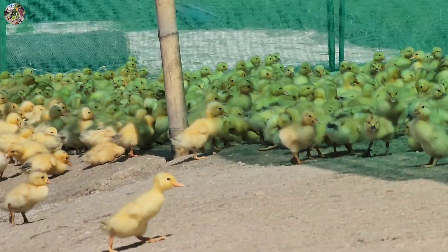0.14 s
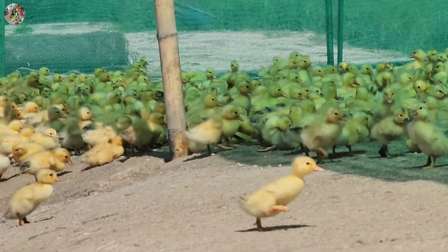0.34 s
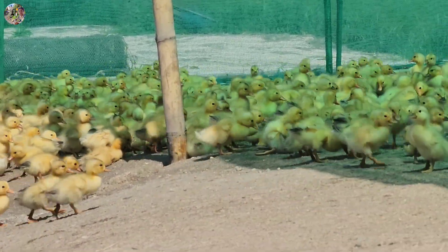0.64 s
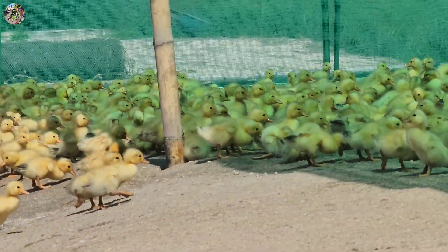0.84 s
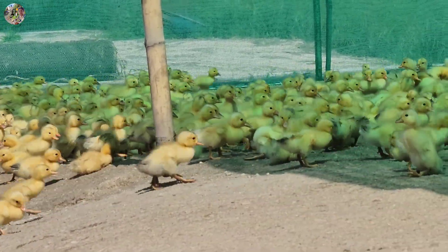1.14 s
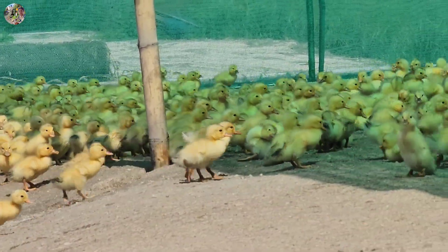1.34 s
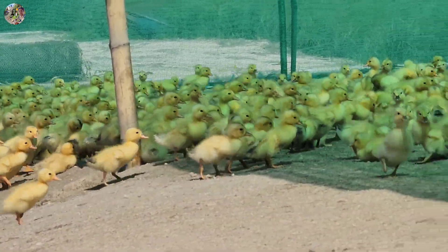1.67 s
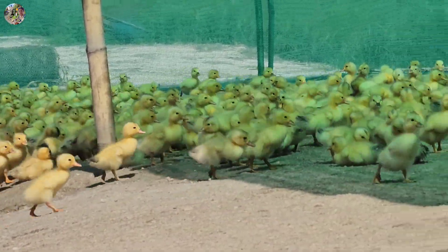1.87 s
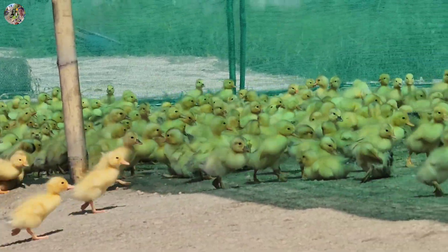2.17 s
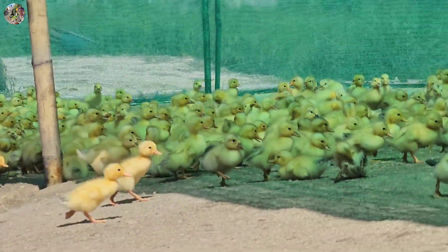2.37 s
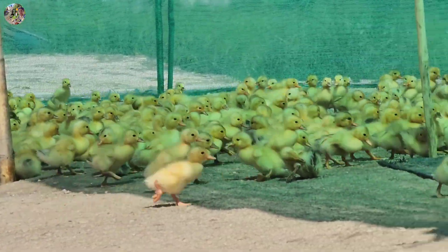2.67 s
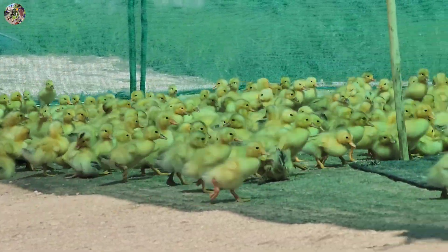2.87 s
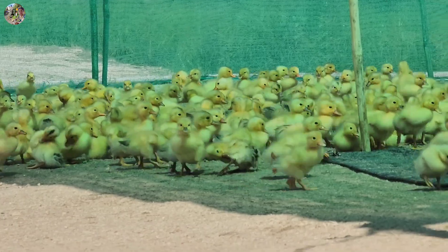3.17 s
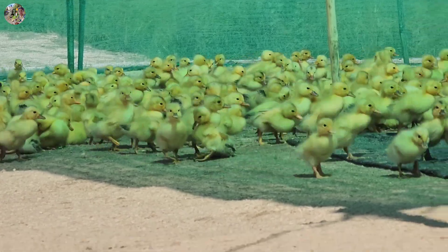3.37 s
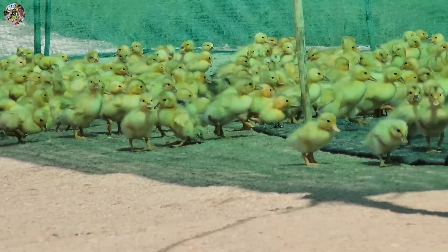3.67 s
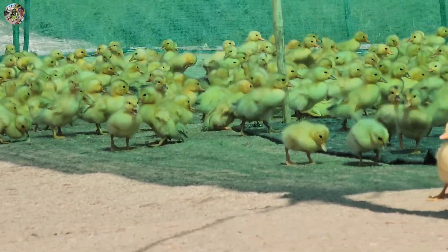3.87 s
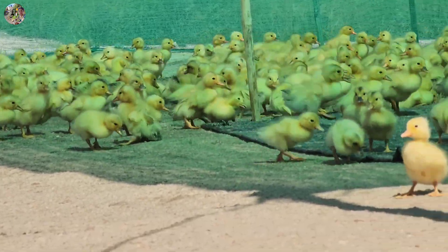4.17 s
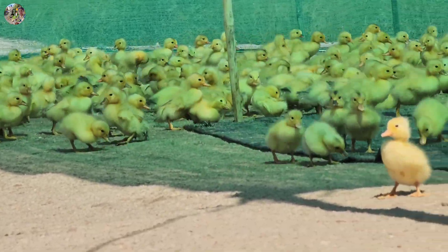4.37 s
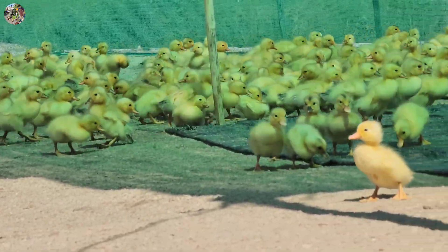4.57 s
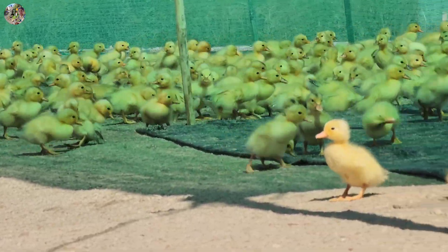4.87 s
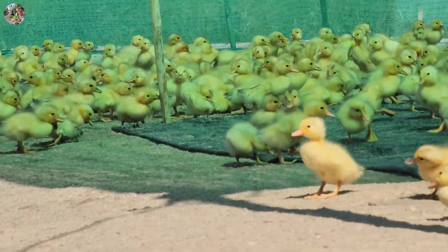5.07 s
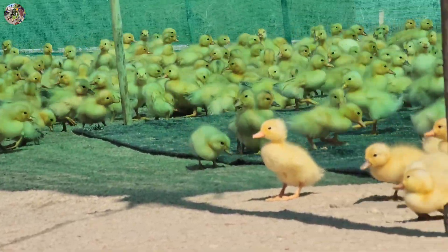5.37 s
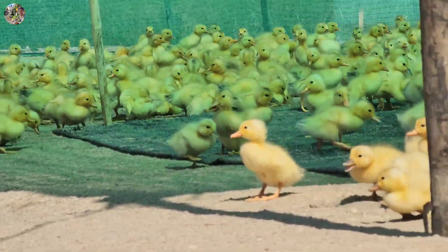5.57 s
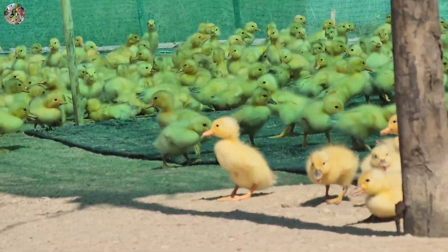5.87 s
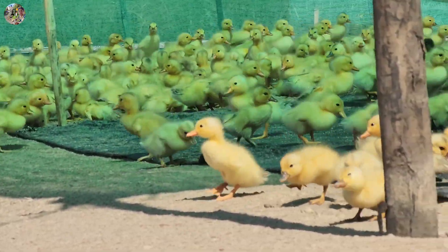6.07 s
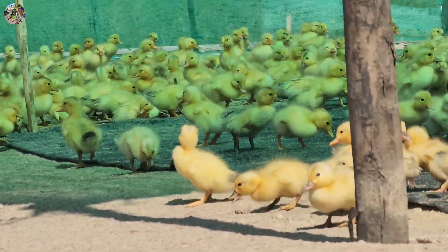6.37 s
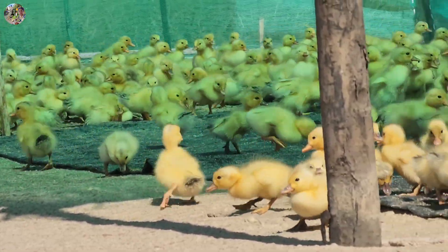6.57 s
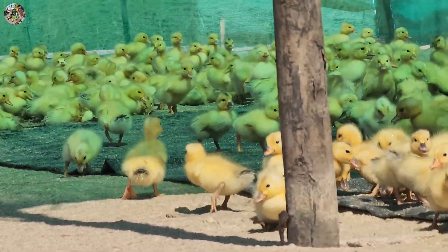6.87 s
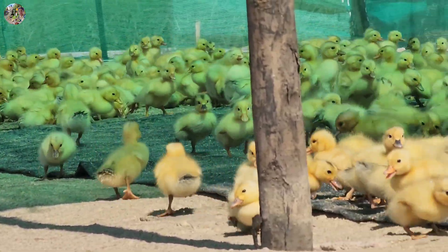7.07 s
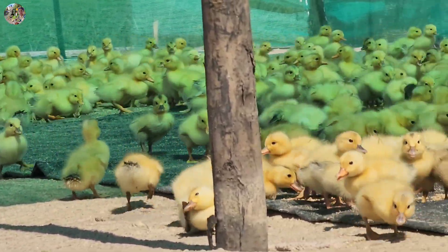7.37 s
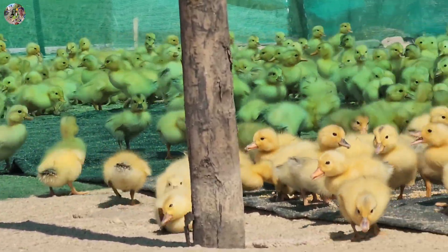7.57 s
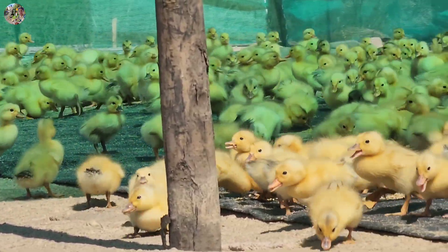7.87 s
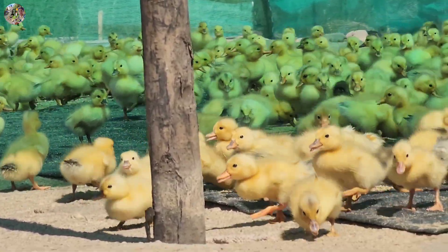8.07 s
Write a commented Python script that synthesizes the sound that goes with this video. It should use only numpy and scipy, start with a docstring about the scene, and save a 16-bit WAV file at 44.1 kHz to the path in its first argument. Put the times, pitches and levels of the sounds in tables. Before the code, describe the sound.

Many ducklings cheep near and far over a steadily puttering small engine, with pattering feet on sand, early rattles and low wind bumps.

```python
"""In a netted outdoor pen a flock of ducklings peeps, a few near and many far: wavering near-sines on curved pitch paths.
Their feet patter on sand as shaped, grainy hiss, with short snaps of grit.
A small engine idles nearby: each firing rings exhaust resonances, with clatter and ticks; hard low thumps stand out.
Wind rumbles as low noise on two microphone ports, and early on something near rattles as struck, damped modes.
A soft airy hiss lies beneath, and the yard scatters a short echo of the birds, snaps, ticks and rattle."""
import sys
import numpy as np
from scipy import signal
from scipy.io import wavfile
from scipy.ndimage import uniform_filter1d

SR = 44100
rng = np.random.default_rng(int(sys.argv[2]) if len(sys.argv) > 2 else 0)


def to_wav(s):
    """Save 16-bit WAV."""
    ch = np.atleast_2d(s).T  # columns
    pcm = np.round(np.clip(ch, -1, 1) * 32767)  # PCM
    wavfile.write(sys.argv[1], SR, pcm.astype(np.int16))


N = 363384  # samples in the scene


def amp(db):
    """Decibel law: 20 dB is a factor of ten in pressure."""
    return 10 ** (np.asarray(db) / 20)


def evened(x):
    """Normalization to unit root-mean-square."""
    return x / np.sqrt(np.mean(x ** 2) + 1e-20)


def curve(points, t):
    """Linear interpolation of a table in time."""
    return np.interp(t, *np.transpose(points))


def read(points, hz):
    """Interpolation of a spectrum table on a logarithmic frequency axis."""
    f, value = np.transpose(points)
    return np.interp(np.log(hz + 1), np.log(f + 1), value)


def sides(pan_db):
    """Level difference between channels: left and right gains, positive towards the left."""
    return amp(np.array([pan_db, -pan_db]) / 2)


def add(mix, s, sound, pan_db=0, lag=0):
    """Superposition with a time difference: the left side is lag samples late, the right if negative."""
    for channel, gain, late in zip(mix, sides(pan_db), (max(lag, 0), max(-lag, 0))):
        part = channel[round(s * SR) + late:][:len(sound)]
        part += gain * sound[:len(part)]


# Likeness of the two ports. Each row: frequency in Hz, left-right correlation before scaling.
LIKENESS = [(60, 1), (150, 1), (380, 0.81), (950, 0.12), (2380, 0.021), (5980, 0), (15000, 0.013)]
# Balance of the two ports. Each row: frequency in Hz, left-right difference in dB.
BALANCE = [(60, -2.5), (180, -0.5), (550, 2), (1650, 2), (4970, 0), (15000, -2.5)]


def noise(tone, size, patchy_db, bins, frames_wide, alike=1):
    """Short-time spectral synthesis: random spectra with drifting patches, partly coherent between ports."""
    frames, hz = N * 4 // size + 5, np.fft.rfftfreq(size, 1 / SR)
    a, b, c, d, patches = rng.standard_normal((frames, len(hz), 5)).T
    patches = uniform_filter1d(patches, bins, 0)
    patches = evened(uniform_filter1d(patches, frames_wide, 1))
    same = np.clip(alike * read(LIKENESS, hz), -1, 1)[:, None]
    left = a + 1j * b
    right = same * left + np.sqrt(1 - same ** 2) * (c + 1j * d)
    spectra = np.array([left, right])
    spectra *= amp(read(tone, hz)[:, None] + patchy_db * patches)
    spectra *= sides(read(BALANCE, hz))[:, :, None]
    sound = signal.istft(spectra, nperseg=size, noverlap=size * 3 // 4)[1]
    return evened(sound[:, :N])


# Strength of the wind. Each row: time in seconds, level in dB averaged over the ports.
GUSTS = [(0.0, -37.5), (2.6, -42.5), (3.44, -48), (4.41, -31), (4.45, -46.5), (6.95, -40), (7.0, -32),
         (7.37, -30), (7.69, -33.5), (7.82, -23), (7.94, -37), (8.16, -26), (8.24, -37)]
# Spectrum of the wind noise. Each row: frequency in Hz, relative density in dB per Hz.
WIND_SPECTRUM = [(12, -43), (20, -24), (45, 3.5), (115, 1), (160, -4), (200, -12.5), (250, -27),
                 (400, -28.5), (550, -56), (800, -90)]


def gusts():
    """Turbulent pressure noise: weakly coherent low-frequency noise follows the gust curve."""
    rumble = noise(WIND_SPECTRUM, size=2048, patchy_db=2.5, bins=6, frames_wide=3, alike=.4)
    level = amp(curve(GUSTS, np.arange(N) / SR))
    return rumble * level * sides(0.7)[:, None]


# Spectrum of the airy hiss. Each row: frequency in Hz, relative density in dB per Hz.
AIR_SPECTRUM = [(120, -10), (200, -6), (304, -11.5), (576, -11), (860, -14), (1430, -13.5), (2340, -19.5),
                (3020, -17), (4600, -24.5), (9190, -25.5), (11000, -31.5), (14500, -28.5), (15600, -40)]
AIR_DB = -47.5


def air():
    """Stationary broadband noise: a soft background hiss at constant mean level."""
    return amp(AIR_DB) * noise(AIR_SPECTRUM, size=1024, patchy_db=2.5, bins=10, frames_wide=12)


# Feet and down of the flock on sand. Each row: time in seconds, level in dB.
RUSTLE_LEVEL = [(0, -52.5), (3.5, -52), (5.67, -56.5), (8.24, -47.5)]
# Spectrum of the rustle. Each row: frequency in Hz, relative density in dB per Hz.
RUSTLE_SPECTRUM = [(500, -24), (1500, 1.5), (3000, -2), (6000, -0.5), (9000, -6), (11000, -10.5),
                   (15500, -11.5)]
# Near birds scurry. Each row: peak time in seconds, build-up time constant in seconds, peak level in dB.
SCURRIES = [(0.44, 0.0061, -39), (0.6, 0.041, -48), (0.617, 0.0069, -47), (1.092, 0.006, -45.5),
            (1.12, 0.023, -46), (1.2, 0.0034, -60), (1.235, 0.017, -58), (3.165, 0.0072, -42),
            (3.44, 0.029, -51)]
SCURRY_FADE_S = 0.018  # time constant


def patter():
    """Friction noise: feet scuff the sand in short uneven grains of hiss, gathered in flurries."""
    t = np.arange(N) / SR
    level = amp(curve(RUSTLE_LEVEL, t))
    for s, build, db in SCURRIES:
        level = level + amp(db) * np.exp(np.minimum((t - s) / build, (s - t) / SCURRY_FADE_S))
    strength = amp(1.5 * np.minimum(rng.exponential(1, (2, N)), 5))
    steps = strength * (rng.random((2, N)) < 350 / SR)  # 350 a second at each port
    shared = steps + .5 * steps[::-1]  # half of each grain reaches the other port
    decay = np.exp(-np.arange(600) / SR / 0.0038)
    grains = signal.oaconvolve(shared, decay[None])[:, :N]
    flurry = uniform_filter1d(rng.standard_normal(N), size=1800)
    flurry = evened(uniform_filter1d(flurry, size=1800))
    hiss = noise(RUSTLE_SPECTRUM, size=256, patchy_db=2.0, bins=8, frames_wide=20)
    return evened(hiss * (1.5 + evened(grains)) * amp(2.16 * flurry)) * level


# Idle speed of the engine. Each row: time in seconds, firings per second.
IDLE_SPEED = [(0, 22.695), (.9, 24.344), (1.6, 24.342), (3.1, 23.594), (3.8, 22.697), (4.6, 22.283),
              (5.1, 21.49), (5.6, 22.017), (6.6, 23.017), (8.24, 24.66)]
FIRST_FIRING_S = .0061


def firings():
    """Phase accumulation: a firing falls where the running count of engine cycles passes a whole number."""
    t = np.arange(FIRST_FIRING_S, N / SR, 1 / SR)
    cycles = np.cumsum(curve(IDLE_SPEED, t)) / SR
    return np.interp(np.arange(int(cycles[-1]) + 1), cycles, t)


# Strength of the thumps. Each row: time in seconds, typical peak in dB.
THUMP_LEVEL = [(0, -26.5), (1.4, -28), (2.7, -29.5), (4.1, -29), (5.5, -30), (6.9, -29), (8.24, -24.5)]
# Resonances of the exhaust pipe. Each row: typical frequency in Hz, typical relative level in dB, T60 in seconds.
PIPE_MODES = [(123.6, 3, 0.11), (91, -6.5, 0.16), (68.8, -10.5, 0.26)]
# Valve gear at every firing. Each row: time in seconds, typical onset level in dB.
CLATTER_LEVEL = [(0, -44.5), (1.5, -52.5), (3, -46.5), (4.5, -50), (6, -53), (8.24, -41)]
# The silencer takes the edge off each thump.
MUFFLER = signal.butter(3, [45, 198], "bandpass", fs=SR, output="sos")


def engine():
    """Impulsive excitation of pipe resonances: each firing of one cylinder thumps, and valve gear clatters."""
    out, t = np.zeros((2, N)), np.arange(4000) / SR
    hz, mode_db, t60 = np.transpose(PIPE_MODES)[:, :, None]
    gear = signal.butter(2, [900, 3300], "bandpass", fs=SR)
    onset = np.sin(np.pi / 2 * np.minimum(t / 0.0047, 1)) ** 2
    for at in firings():
        strength, detune, loose, *weight = rng.standard_normal(3 + len(PIPE_MODES))
        decay = amp(mode_db + 5.84 * np.c_[weight] - 60 * t / t60)
        ring = decay * np.sin(2 * np.pi * hz * (1 + 0.053 * detune) * t)
        thump = -ring.sum(0) * onset  # the pressure first drops
        thump = signal.sosfilt(MUFFLER, thump)
        thump_gain = amp(curve(THUMP_LEVEL, at) + 2.67 * strength)
        add(out, max(at - .004, 0), thump_gain * thump / abs(thump).max(), 1.2)
        clack = evened(signal.lfilter(*gear, rng.standard_normal(800)))
        clack = clack * np.exp(-t[:800] / 0.0043)
        add(out, at, amp(curve(CLATTER_LEVEL, at) + 2 * loose) * clack, 2.5, lag=5)
    return out


def knocks(events, modes, rise, lag, chatter_db, puff_db, spread_db, detune_by):
    """Modal synthesis: a blow and its loose chatter ring slightly detuned damped modes, with a dry puff."""
    out, t = np.zeros((2, N)), np.arange(1500) / SR
    hz, mode_db, t60 = np.transpose(modes)[:, :, None]
    for s, db in events:
        detune, weight = rng.standard_normal((2, len(modes), 1))
        decay = amp(mode_db + spread_db * weight - 60 * t / t60)
        ring = decay * np.sin(2 * np.pi * hz * (1 + detune_by * detune) * t)
        ring = ring.sum(0) * (1 - np.exp(-t / rise))
        puff = amp(puff_db - 60 * t / 0.0031) * uniform_filter1d(rng.standard_normal(len(t)), size=2)
        chatter = amp(chatter_db - 60 * t / 0.052) * rng.standard_normal(len(t))
        blows = chatter * (rng.random(len(t)) < .02)
        blows[0] = 1
        knock = signal.fftconvolve(ring / abs(ring).max() + puff, blows)
        add(out, s, amp(db) * knock, 1.2, lag)
    return out


# Soft ticks at the other firings. Each row: time in seconds, mean nominal peak in dB.
SOFT_TICK_LEVEL = [(0, -51.5), (1.6, -44), (2.1, -45), (3.1, -57), (3.6, -46), (4.3, -45), (5.3, -44),
                   (5.8, -46), (6.9, -45), (8.24, -64)]
# Loudest ticks, most of them of the valve gear. Each row: start in seconds, nominal peak in dB.
LOUD_TICKS = [(2.1351, -40), (2.1769, -35.5), (2.217, -36), (2.5518, -36.5), (2.636, -33), (2.7198, -40),
              (2.764, -34.5), (2.804, -37), (3.144, -36), (3.522, -34), (3.926, -32.5), (3.9689, -35.5),
              (4.232, -35), (4.28, -36), (4.593, -41), (4.635, -33.5), (4.6832, -41), (4.7263, -36),
              (4.771, -39), (4.8167, -37), (4.8632, -34.5), (4.909, -37), (4.9558, -32), (5.003, -32),
              (5.0484, -41), (5.0943, -35), (5.1405, -35), (5.1864, -39), (5.2325, -39), (5.2774, -42),
              (5.4149, -36.5), (5.507, -36), (7.2936, -34)]
TICK_SPREAD_DB = 4.5  # standard deviation


def soft_ticks():
    """Periodic excitation of random strength: one tick at every firing that has no loud tick nearby."""
    at = firings()
    db = curve(SOFT_TICK_LEVEL, at) + TICK_SPREAD_DB * rng.standard_normal(len(at))
    to_loud = abs(at[:, None] - np.transpose(LOUD_TICKS)[0]).min(axis=1)
    return np.c_[at, db][to_loud > .015]


# Modes of a tick. Each row: typical frequency in Hz, typical relative level in dB, T60 in seconds.
TICK_MODES = [(1894, 3, 0.02), (2770, -2, 0.014), (2120, -1.5, 0.016)]


def ticks():
    """Impact of small parts: loud and soft ticks, nearly all of the engine, ring a few quickly damped modes."""
    return knocks([*LOUD_TICKS, *soft_ticks()], TICK_MODES, rise=0.00049, lag=5,
                  chatter_db=-14, puff_db=-8, spread_db=1.0, detune_by=0.01)


OCTAVE_DB = -11  # overtone of the short peeps, reached at their end
FLUTTER_DB, WAVER = 3.5, .011  # unsteadiness of level in dB and of pitch as a share


def peep(hz, db, octave_db=OCTAVE_DB, flutter_db=FLUTTER_DB, round_by=0.54):
    """Self-sustained oscillation of the syrinx: an unsteady near-sine on a pitch path, with a growing octave."""
    u = np.linspace(0, 1, len(hz))
    wobble = uniform_filter1d(rng.standard_normal((2, len(u))), size=200)
    wobble = evened(wobble - wobble.mean(axis=1, keepdims=True))
    phase = 2 * np.pi * np.cumsum(hz * (1 + WAVER * wobble[0])) / SR
    swell = evened(abs(np.sin(np.pi * u)) ** round_by * amp(flutter_db * wobble[1]))
    tone = np.sin(phase) + amp(octave_db) * u * np.sin(2 * phase)
    return np.sqrt(2) * amp(db) * swell * tone


def arched(length, middle, rise, height):
    """Parabolic frequency modulation: a slope with an arch on top, reaching middle halfway."""
    u = np.linspace(-1, 1, int(length * SR))
    return middle + rise * u / 2 - height * u ** 2


def settling(length, tau):
    """Exponential relaxation from 1 towards 0 with a time constant."""
    return np.exp(-np.arange(int(length * SR)) / SR / tau)


FLOCK_PER_S, LOUDEST_DB = 130, -59.5  # far peeps a second, level of the loudest
FLOCK_HZ = (2390, 3904)  # range of middle pitch


def far_flock():
    """Random superposition: many faint arched or falling peeps at independent moments and directions."""
    out = np.zeros((2, N))
    for when, high, fall, arch, long, loud, side in rng.random((int(FLOCK_PER_S * N / SR), 7)):
        middle = FLOCK_HZ[0] + high * (FLOCK_HZ[1] - FLOCK_HZ[0])
        path = arched(.025 + .035 * long, middle, (.3 - fall) * 1800, arch * 1000)
        sound = peep(path, LOUDEST_DB - 13 * loud)
        add(out, when * N / SR, sound, 8 * (side - .5), int(40 * (.5 - side)))
    return out


# Near arched peeps. Each row: start in seconds, length in seconds, pitch halfway in Hz,
# rise from start to end in Hz, level in dB, left-right difference in dB.
ARCHED_PEEPS = [(0.178, 0.052, 4080, 200, -43.5, -1.5), (0.322, 0.04, 4260, 2100, -39, 3.5),
                (0.562, 0.058, 3650, -740, -48, 2), (0.707, 0.046, 3900, 1000, -44, 3),
                (0.728, 0.04, 4400, -400, -53, 1), (0.89, 0.037, 3760, -100, -49, 4),
                (0.9, 0.02, 3280, 800, -54, 3), (1.047, 0.056, 4010, 700, -46, 3),
                (1.213, 0.03, 4800, -350, -46.5, 1.5), (1.388, 0.021, 3750, 800, -54, 3),
                (1.536, 0.043, 4110, -650, -49.5, 2), (1.705, 0.039, 4390, 97, -57, 1),
                (1.796, 0.083, 3740, -450, -55.5, -3), (1.969, 0.024, 4050, 600, -53.5, 0.5),
                (2.04, 0.058, 4150, 430, -56, 2), (2.214, 0.028, 4030, 0, -50.5, 2),
                (2.271, 0.043, 3430, 200, -53, 3), (2.688, .033, 3790, 100, -49, 3),
                (2.854, 0.026, 3560, 500, -49.5, 0), (3.202, .026, 4120, 200, -51, 1),
                (3.751, 0.05, 3370, 104, -53, 2), (3.78, 0.044, 3160, 802, -50, 5),
                (3.964, 0.025, 4200, -340, -50, -3.5), (4.509, .045, 3280, 304, -55, 2),
                (4.567, 0.053, 3400, 800, -56, 2), (4.636, 0.04, 3040, 300, -57, 2),
                (4.71, 0.031, 3750, 300, -57, 3), (4.771, 0.039, 3250, 100, -54.5, 4),
                (4.97, 0.038, 2730, -620, -52, 5), (5.485, 0.054, 2974, 846, -50, 5),
                (5.604, 0.046, 3180, 100, -50.5, 5), (5.716, .035, 3480, -100, -64, 5),
                (6.024, 0.037, 3220, 900, -54, 3), (6.32, .03, 4540, -30, -57, -2),
                (6.35, 0.029, 4450, -30, -56, -1), (6.445, 0.033, 3270, -350, -56, 5),
                (6.554, 0.044, 3450, -800, -51, 3.5), (7.002, 0.028, 3340, -130, -50.5, 0.4),
                (7.106, 0.03, 3480, -260, -49, 3.5), (7.417, 0.048, 3140, 200, -53, 4.5),
                (7.51, 0.042, 3140, 800, -48, 1), (7.662, 0.04, 3460, 442, -44, 1.5),
                (8.063, 0.055, 3140, 100, -48, 3.5), (8.212, 0.035, 3250, 1150, -48.5, -1)]
# Longer peeps, and those louder than usual, arch higher over their ends.
ARCH_HZ_PER_S, ARCH_HZ_PER_DB, USUAL_DB = 17000, 46, -49


def arched_peeps():
    """Frequency modulation coupled to effort: near peeps arch higher the longer and louder they are."""
    out = np.zeros((2, N))
    for s, length, hz, rise, db, pan_db in ARCHED_PEEPS:
        height = ARCH_HZ_PER_S * length + ARCH_HZ_PER_DB * max(db - USUAL_DB, 0)
        add(out, s, peep(arched(length, hz, rise, height), db), pan_db, int(-pan_db))
    return out


# Hardest low thumps, of wind or engine. Each row: envelope peak in seconds, envelope peak in dB,
# pitch in Hz, left-right difference in dB.
HARD_THUMPS = [(0.304, -21.5, 101, 2), (0.431, -23.5, 91, -1), (0.53, -24, 107, -1), (0.655, -20, 100, 2.5),
               (0.856, -21, 110, 0), (0.908, -23, 110, 1), (1.6, -22.5, 79, 0), (1.89, -22.5, 100, 1),
               (2.783, -26.5, 74, 4), (2.912, -24.5, 92, 1.5), (4.017, -22.5, 105, 0),
               (4.105, -21.5, 100, -2), (4.372, -25, 70, 17), (4.798, -23, 106, 1.5),
               (5.167, -22.5, 85, 1.5), (6.046, -22.5, 93, 2), (6.301, -25.5, 93, 1), (7.016, -21, 75, -5),
               (7.11, -23.5, 110, 17), (7.192, -29, 70, -9), (7.31, -17, 119, 7.5), (7.357, -22, 120, 15),
               (7.404, -21.5, 150, 9), (7.512, -19.5, 130, 8), (7.594, -23, 100, -4), (7.642, -28, 100, 15),
               (7.819, -16.5, 95, 12), (7.845, -29.5, 200, 9), (7.871, -25, 70, -7), (7.906, -26.5, 169, 0),
               (7.985, -32, 70, -9), (8.062, -28, 120, -3), (8.136, -19.5, 88, 9), (8.157, -16.5, 130, -14),
               (8.164, -27.5, 374, -5.5)]


def hard_thumps():
    """Transient pressure pulses: short low thumps strike the louder port earlier."""
    out = np.zeros((2, N))
    for (s, db, hz, pan_db), phase in zip(HARD_THUMPS, rng.random(len(HARD_THUMPS))):
        u = np.arange(0, 3.644 / hz, 1 / SR)  # a few cycles long
        thump = np.sin(2 * np.pi * (hz * u + phase)) * np.sin(np.pi * u / u[-1]) ** 2
        add(out, s - u[-1] / 2, amp(db) * thump, pan_db, int(pan_db * -6))
    return out


# Sliding peeps, most of them falling. Each row: start in seconds, length in seconds, start pitch in Hz,
# end pitch in Hz, level in dB, left-right difference in dB.
SLIDING_PEEPS = [(0.304, 0.044, 1874, 1865, -49.5, -6), (2.05, 0.032, 2290, 2740, -50.5, 5),
                 (2.527, 0.068, 3560, 2330, -48, 6.5), (2.624, 0.042, 4180, 4650, -55, -3),
                 (2.67, 0.026, 3450, 3230, -48, 4), (2.928, 0.047, 4300, 2700, -45, 5),
                 (3.15, 0.04, 4480, 3880, -50, -4.5), (3.215, 0.026, 3550, 3480, -53, 2),
                 (3.42, 0.071, 4720, 3600, -47, 4.5), (3.471, 0.082, 3730, 3540, -55, -4),
                 (3.666, 0.068, 4800, 3440, -44, 4), (3.704, 0.035, 3200, 2290, -47, 6),
                 (3.888, 0.069, 3380, 3400, -47, 5), (3.965, .03, 3720, 3720, -51, 4),
                 (3.944, 0.038, 4200, 2800, -47, 6), (4.168, 0.062, 4300, 3330, -52, 6.5),
                 (4.236, 0.025, 4350, 4000, -55, -7), (4.255, .02, 2300, 3470, -56, 7),
                 (4.314, 0.06, 3420, 3370, -52, 8), (4.39, .022, 2600, 3420, -55, 4),
                 (4.488, 0.0276, 3670, 3040, -55, 2), (4.68, 0.027, 3480, 3300, -51, 8),
                 (5.137, 0.049, 3950, 2930, -53, 5), (5.364, 0.029, 3420, 2780, -55, 3.5),
                 (7.129, 0.034, 1170, 1180, -54, 7), (7.199, 0.046, 4620, 4480, -46.5, 3),
                 (7.237, 0.017, 4420, 5150, -46, 6.5), (7.712, 0.016, 3730, 2950, -46, 8),
                 (7.762, .038, 3950, 2780, -53, 9.5), (8.025, 0.04, 3880, 3230, -47, 3.5)]
SLIDE_S = 0.084  # time constant


def sliding_peeps():
    """Exponential glide: the pitch moves steepest at first and slows towards its end."""
    out = np.zeros((2, N))
    for s, length, start, end, db, pan_db in SLIDING_PEEPS:
        left = settling(length, SLIDE_S)
        path = end + (start - end) * (left - left[-1]) / (1 - left[-1])
        add(out, s, peep(path, db), pan_db, int(-pan_db))
    return out


# Dry snaps of grit. Each row: start in seconds, nominal peak in dB, dull body in dB relative to that peak,
# left-right difference in dB.
GRIT_SNAPS = [(0.4262, -28, -31, 15), (0.435, -30, -22, 8), (0.447, -20.5, -27, 4), (0.457, -38, -25, 1),
              (0.493, -25, -30, 2), (0.5176, -45, -11, 1.5), (0.613, -27, -21, 2), (1.968, -44, -17, -.5),
              (2.776, -37, 4, 8), (2.898, -39.5, 2, 7), (4.411, -32, -21, -1), (7.293, -35, -8, 0),
              (7.9069, -18.5, -24, -7)]
CRACK = slice(14, 16)  # samples at which a snap breaks


def snaps():
    """Brittle impulse: a crack, a sharp hiss and a duller body decay within milliseconds."""
    out, t = np.zeros((2, N)), np.arange(800) / SR
    low = signal.butter(2, [700, 2500], "bandpass", fs=SR)
    envelope = np.exp(-t / 0.0033) * (1 - np.exp(-t / 0.00017))
    for s, db, body_db, pan_db in GRIT_SNAPS:
        sharp, dull = rng.standard_normal((2, len(t)))
        hiss = 0.19 * uniform_filter1d(sharp, size=2)
        burst = hiss + amp(body_db) * evened(signal.lfilter(*low, dull))
        burst[CRACK] += rng.choice([-1, 1]) * np.array([1.1, 0.45])
        add(out, s, amp(db) * burst * envelope, pan_db)
    return out


# Bouts of lighter knocking. Each row: start in seconds, length in seconds, mean nominal peak in dB.
KNOCK_BOUTS = [(0.43, .03, -44), (0.492, .03, -47), (0.538, .012, -38), (0.558, .025, -45),
               (0.59, .03, -51), (1.078, .08, -38), (1.201, .08, -46), (1.561, .09, -41.5)]
KNOCKS_PER_S, KNOCK_RANGE_DB = 220, 5  # range either way


def light_knocks():
    """Jittered pulse train: unevenly spaced knocks of uneven strength fill each bout."""
    rows = []
    for s, length, db in KNOCK_BOUTS:
        rows += [(x, db) for x in np.arange(s, s + length, 1 / KNOCKS_PER_S)]
    s, db = np.transpose(rows)
    late, loud = rng.random((len(s), 2)).T
    return np.c_[s + late / KNOCKS_PER_S, db + KNOCK_RANGE_DB * (2 * loud - 1)]


# Hardest knocks of the near rattle. Each row: start in seconds, nominal peak in dB.
HARD_KNOCKS = [(0.5455, -34), (0.5505, -28), (0.5664, -35), (0.5696, -25.5), (0.574, -34), (0.5937, -49),
               (0.6083, -31), (0.6113, -29), (0.6246, -24), (1.0762, -34), (1.0845, -32), (1.0898, -21.5),
               (1.095, -31), (1.0988, -29), (1.1035, -30), (1.1064, -39), (1.1146, -35), (1.1284, -36),
               (1.1324, -30), (1.1375, -31), (1.1431, -27), (1.1552, -32.5), (1.1669, -33), (1.1956, -20.5),
               (1.208, -31), (1.216, -36), (1.236, -25.5), (1.2568, -32), (1.2607, -37), (1.2674, -35),
               (1.2746, -35), (1.5894, -45), (1.6263, -37)]
# Modes of the rattle. Each row: typical frequency in Hz, typical relative level in dB, T60 in seconds.
RATTLE_MODES = [(1710, -6, 0.012), (1885, -3.5, 0.014), (2100, -2.5, 0.017), (2900, -0.5, 0.013),
                (3420, -6, 0.0086), (4780, -11, 0.0057)]


def rattle():
    """Repeated impact: hard and light knocks excite the same strongly damped modes."""
    return knocks([*HARD_KNOCKS, *light_knocks()], RATTLE_MODES, rise=0.0004, lag=-20,
                  chatter_db=-19, puff_db=-15.0, spread_db=4.0, detune_by=0.027)


# One bird whistles a steady series. Each row: start in seconds, length in seconds, settled pitch in Hz,
# level in dB, octave at the end in dB against the note.
WHISTLES = [(4.799, 0.052, 3950, -56, -20), (5.078, 0.12, 4010, -57.5, -16),
            (5.356, 0.108, 4070, -57.5, -16), (5.626, 0.15, 4170, -59, -16), (5.914, 0.12, 4240, -57, 2),
            (6.208, 0.118, 4250, -56, -5), (6.499, 0.14, 4270, -55, -18), (6.794, 0.13, 4200, -57, -16),
            (7.107, 0.088, 4040, -55, -16), (7.397, 0.095, 3950, -54.5, -16)]
DROP_HZ, SETTLE_S, WHISTLER_PAN_DB = 643, 0.017, -5


def whistles():
    """Relaxation of pitch: each whistle drops quickly onto its note and holds it."""
    out = np.zeros((2, N))
    for s, length, hz, db, octave_db in WHISTLES:
        path = hz + DROP_HZ * settling(length, SETTLE_S)
        add(out, s, peep(path, db, octave_db, flutter_db=4, round_by=.2), WHISTLER_PAN_DB, lag=9)
    return out


def yard(x):
    """Diffuse scattering off ground, posts and net: sparse decaying taps of random sign, other taps per port."""
    t = np.arange(4000) / SR
    signs = rng.choice([-1., 1.], (2, len(t)))
    sparse = rng.random((2, len(t))) < .04
    taps = signs * sparse * amp(-60 * t / 0.083) * (t > .002)
    taps = taps / np.linalg.norm(taps, axis=1, keepdims=True)
    return signal.fftconvolve(x, taps, axes=1)[:, :N]


def scene():
    """Linear superposition of all sources and the scattered echo."""
    birds = far_flock() + arched_peeps() + sliding_peeps() + whistles()
    hard = ticks() + snaps() + rattle()
    echo = yard(amp(-9) * birds + amp(-7) * hard)
    low = gusts() + engine() + hard_thumps()
    return low + air() + patter() + birds + hard + echo


EDGE_HZ = 15650


def record(dry):
    """Band limitation of the recorder: a linear-phase low-pass filter."""
    lowpass = signal.firwin(511, EDGE_HZ, window=("kaiser", 9), fs=SR)
    return signal.oaconvolve(dry, lowpass[None], "same")


dry = scene()
out = record(dry)
to_wav(out)
```